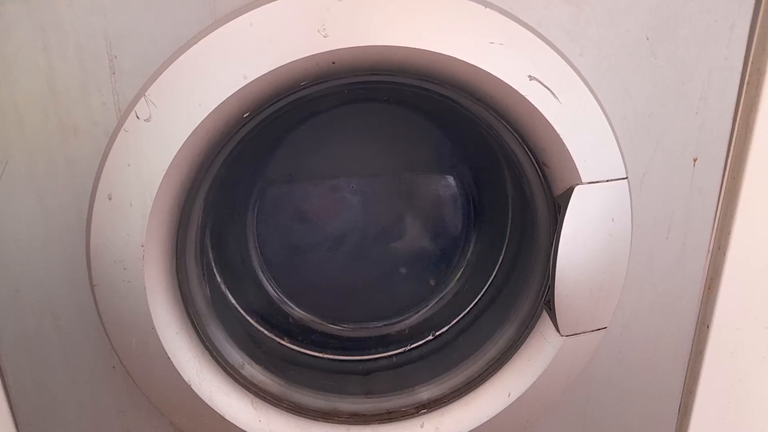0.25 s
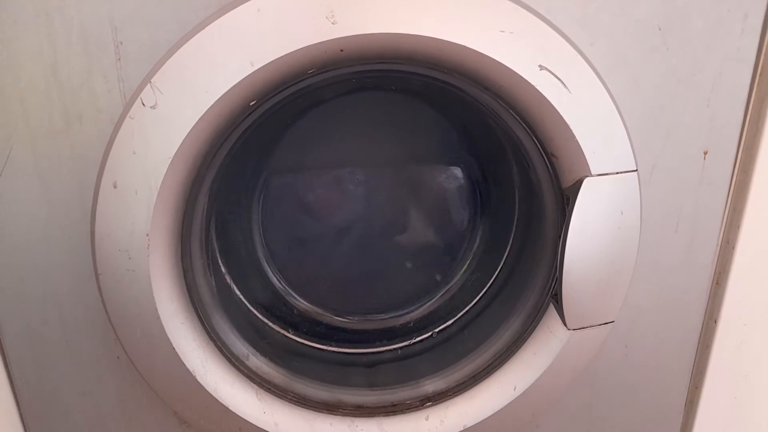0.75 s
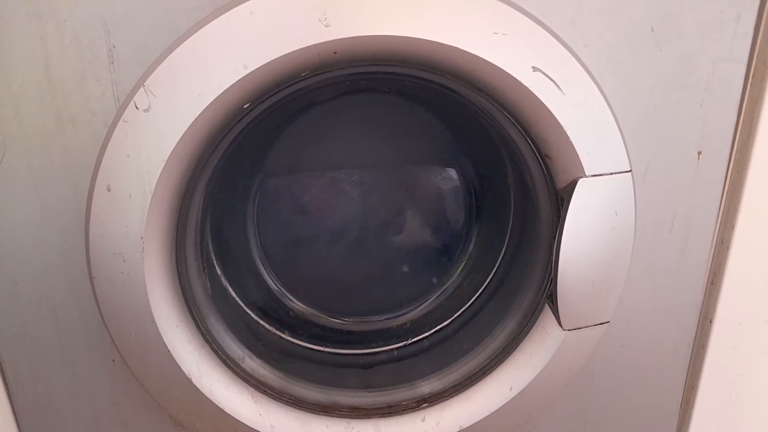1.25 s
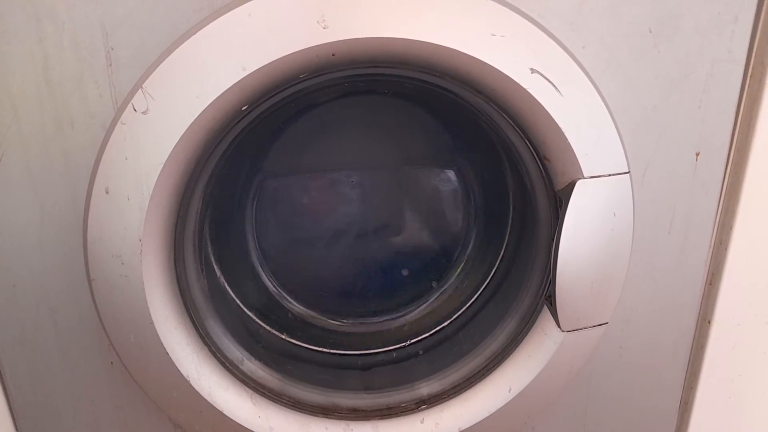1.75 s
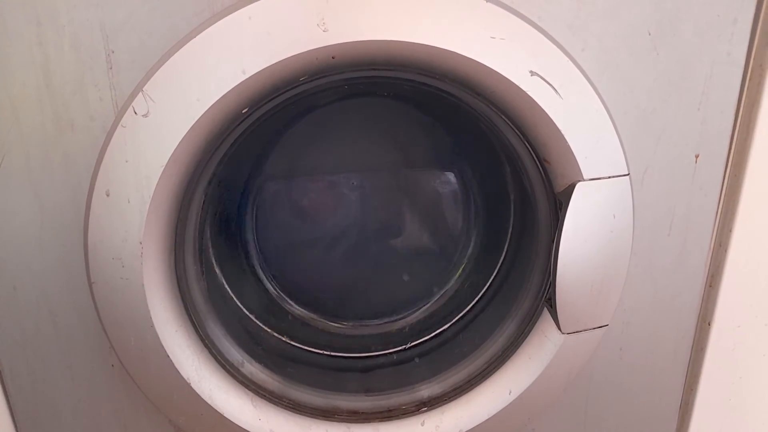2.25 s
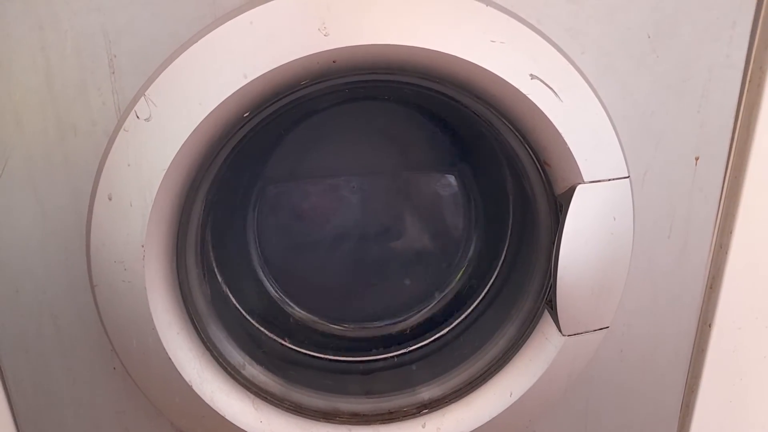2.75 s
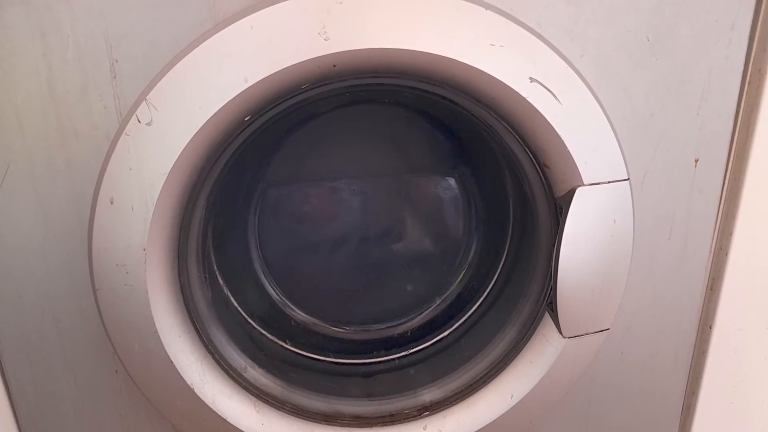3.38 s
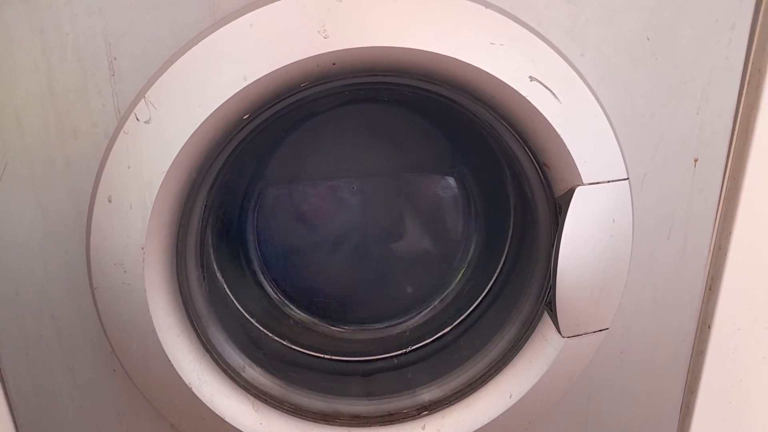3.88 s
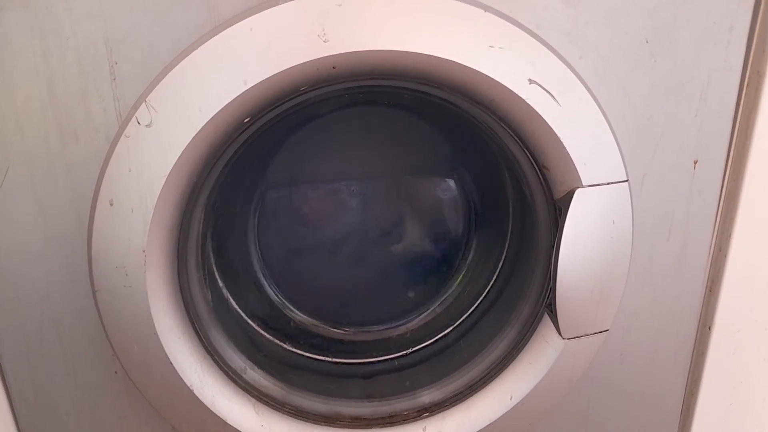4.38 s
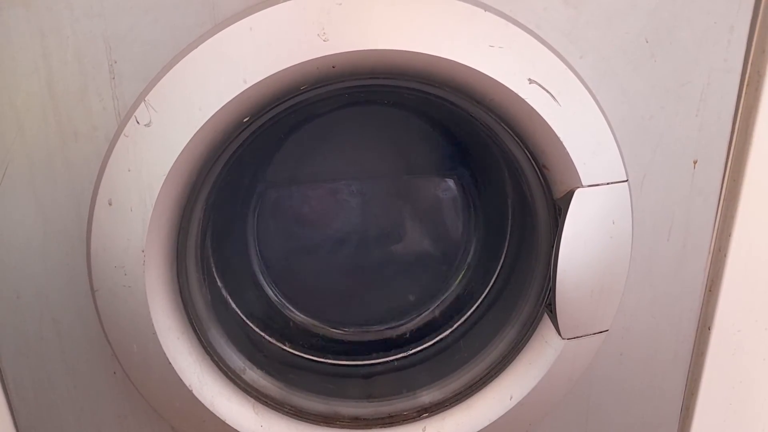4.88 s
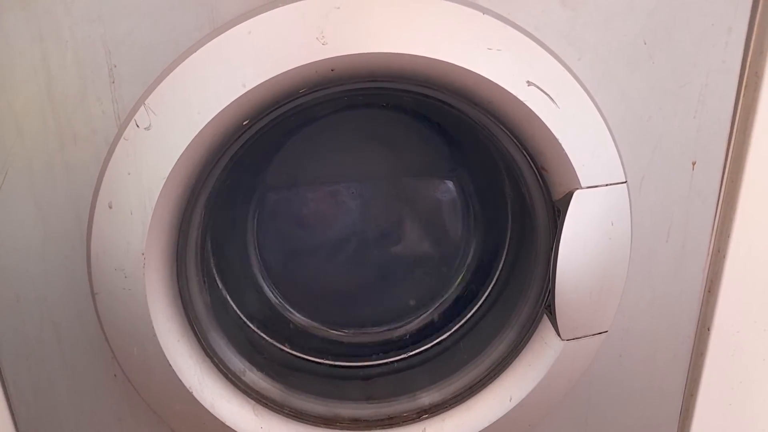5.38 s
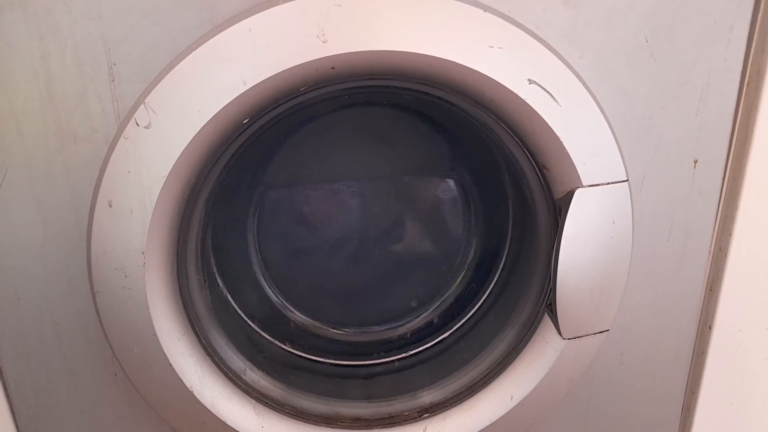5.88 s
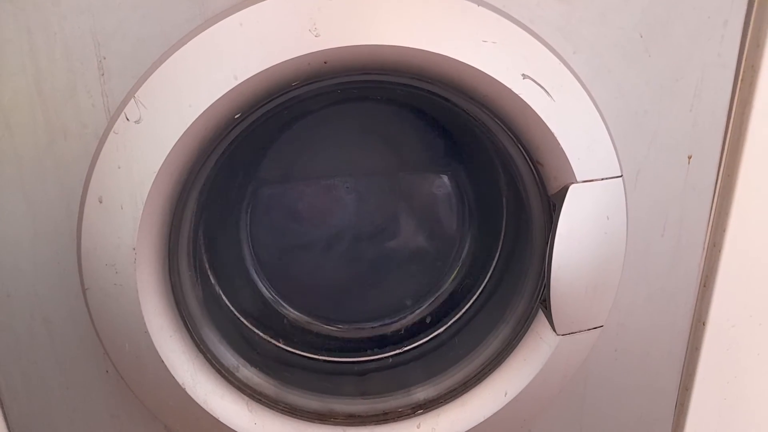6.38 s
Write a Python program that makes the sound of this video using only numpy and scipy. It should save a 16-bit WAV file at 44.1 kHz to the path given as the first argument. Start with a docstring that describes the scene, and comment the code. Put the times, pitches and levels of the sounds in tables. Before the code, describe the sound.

From 0 s a front-loading washing machine is already running fast in a small reverberant room, heard close in stereo. A low cabinet hum near 140 Hz and rapid drum throbs, about twelve turns a second, sit under a piercing, reedy motor whine with strong overtones around 2.6 and 5 kHz. The whine falls smoothly throughout, losing about a fifth of its pitch by 6.6 s, its overtones surging and fluttering as they cross resonances. The low hum weakens over the first seconds and the throbbing slows, swelling unevenly. Airy rush fades while hollow bearing roar grows and churns in short lumps, becoming duller. Dull tub knocks come around 0.9, 1.3, 1.7, 2.5-2.9, 3.3 and 3.7 s, then softer ones from 5.4 s. Fine brush buzz and hiss persist; two faint, high scraping hisses swell between 5.6 and 6.4 s. It ends still spinning.

```python
"""A cabinet already humming and thumping, under a whine that sinks: a front-loading washing machine
coasts down from its final spin in a small tiled room. The belt-driven drum strikes the cabinet twice
a turn, sweeping its overtones through the panel resonances, while the motor whines at its slot rate.
Filtered noise makes the bearings' churning roar, the rush of air and dull knocks; the brushes buzz
and hiss, drum and belt add faint tones, and two scraping hisses come near the end."""
import sys
import numpy as np
from scipy import signal
from scipy.fft import rfft, irfft
from scipy.io import wavfile
from scipy.ndimage import uniform_filter1d

SR = 44100
rng = np.random.default_rng(int(sys.argv[2]) if len(sys.argv) > 2 else 0)


def dump_mix(stems):
    """Bounce the given channels to the path in sys.argv[1] as a 16-bit WAV at rate SR."""
    frames = np.atleast_2d(stems).T  # one column per channel
    limited = np.clip(frames, -1, 1)  # hard clip at full scale
    pcm = np.round(limited * 32767).astype(np.int16)
    wavfile.write(sys.argv[1], SR, pcm)


N = 292824
TIME = np.arange(N) / SR
BELT_RATIO, SLOTS = 11.595, 18  # shaft turns per drum turn; slots on the rotor


def amp(db):
    """Logarithmic level: decibels to amplitude gain."""
    return 10 ** (np.asarray(db) / 20)


def unit(x):
    """Normalisation: scales to rms 1."""
    return x / np.sqrt(np.mean(x ** 2) + 1e-20)


def over_time(points):
    """Linear interpolation of a (time, value) table at every sample."""
    t, value = np.transpose(points)
    return np.interp(TIME, t, value)


def on_log_axis(points, x):
    """Interpolation along a logarithmic axis of frequency or order."""
    place, value = np.transpose(points)
    return np.interp(np.log(x + 1e-3), np.log(place), value)


def lift_db(peaks, hz):
    """Superposed resonance curves: bell-shaped lifts, or dips where negative, added in dB."""
    return sum(db / (1 + (2 * (hz - f) / width) ** 2) for f, width, db in peaks)


def drift(rate_hz, size=N, count=2 ** 13):
    """Low-passed random fluctuation of rms 1, drawn on a coarse grid of count points."""
    hz = np.fft.rfftfreq(count, size / count / SR)
    lowpass = 1 / (1 + (hz / rate_hz) ** 2) ** 2
    coarse = unit(irfft(rfft(rng.standard_normal(count)) * lowpass))
    return np.interp(np.arange(size), np.linspace(0, size, count), coarse)


def resonate(x, hz, width_hz):
    """Resonance: a second-order peak filter of gain 1 at its centre."""
    return signal.lfilter(*signal.iirpeak(hz, hz / width_hz, fs=SR), x)


def split(x, hz):
    """Complementary band division: the parts below and above a frequency."""
    low = signal.sosfiltfilt(signal.butter(2, hz, fs=SR, output="sos"), x)
    return low, x - low


def room(x, wet_db, t60=0.5, size=SR // 3, count=SR // 12):
    """Reverberation: direct sound plus a decaying tail, so a gliding tone flutters about a mean level of 1."""
    t = np.arange(size) / SR
    tail = rng.standard_normal((2, size)) * 1000 ** (-t / t60) * (t > .003)
    tail /= np.linalg.norm(tail, axis=1, keepdims=True)
    heard = x + amp(wet_db) * signal.oaconvolve(x, tail, axes=1)[:, :N]
    mean_power = uniform_filter1d((heard ** 2).mean(0), count)
    return heard / np.sqrt(mean_power + 1e-12)


# tub resonances that ring in the noise: f/Hz, width/Hz, lift/dB
TUB_MODES = [(300, 62, 7), (360, 56, 4), (417.8, 28, 11), (550, 21, 7), (686, 70, 1), (725, 22, 4.5),
             (818, 31.6, 9), (902, 23, 5.5), (975.5, 18, 8.5), (1167, 7.9, 7.5), (1377, 24, 7),
             (1485, 41, 7.5), (1752, 44, 9), (1860, 94, 8)]
# correlation of the two microphones' noise: f/Hz, likeness (1 = same)
MIC_LIKENESS = [(30, 0.3), (160, 0.76), (300, 0.95), (600, 0.73), (1200, 0.34), (2500, 0.47),
                (15000, -0.12)]
# left over right in that noise: f/Hz, level/dB
MIC_BALANCE = [(160, -1), (740, -0.5), (1220, -2.5), (2010, -9.5), (3330, 1), (9080, -1), (15000, 1)]


def tub_noise(colour):
    """Filtered noise: random excitation shaped by tub modes, partly coherent between two microphones."""
    hz = np.fft.rfftfreq(N, 1 / SR)
    a, b = rfft(rng.standard_normal((2, N)))
    same = np.clip(on_log_axis(MIC_LIKENESS, hz), -1, 1)
    pair = np.array([a, same * a + np.sqrt(1 - same ** 2) * b])
    sides = amp(np.outer([.5, -.5], on_log_axis(MIC_BALANCE, hz)))
    spectrum = amp(on_log_axis(colour, hz) + lift_db(TUB_MODES, hz))
    return unit(irfft(pair * sides * spectrum, N))


# the drum's blows in each turn: place/turn, signed force
DRUM_BLOWS = [(.75, 0.61), (0.2585, -0.3)]
# how hard the load pushes the cabinet, beyond what its speed alone gives: t/s, level/dB
LOAD_SWAY = [(0, -1.5), (.8, 0.5), (1.5, 0.5), (2.202, -1), (2.7, 1), (3.3, 0.5), (3.9, -0.5), (4.4, -1),
             (5.6, 0), (6.64, -3)]
# cabinet panel modes: f/Hz, width/Hz, level/dB
PANEL_MODES = [(33, 1.8, -41), (62.7, 3.3, -63), (74.7, 6.7, -56.5), (88.6, 3.3, -49), (111.8, 2.7, -45),
               (116.5, 2.8, -38.5), (130.4, 12, -53.5), (141.2, 3.3, -47.5), (141.4, 3.6, -40),
               (142.7, 4.9, -37.5), (147.8, 5.5, -41.5), (160, 1.2, -49), (178.2, 0.76, -39.5)]


def drum(turns, speed_power=1.65, unevenness=0.089, low_hz=52, top_hz=220, count=22):
    """Forced vibration: an unbalanced load knocks the tub, harder at speed, and the panel modes ring."""
    blows = np.zeros(len(turns))
    for place, force in DRUM_BLOWS:
        for k in range(3, count):  # harmonics of the drum's turning rate
            blows += force * np.cos(2 * np.pi * k * (turns - place))
    strength = unit(np.gradient(turns)) ** speed_power
    strength = strength * (1 + unevenness * drift(0.92, size=len(turns)))
    t = np.arange(N - len(turns), N) / SR
    strength = strength * amp(np.interp(t, *np.transpose(LOAD_SWAY)))
    # soft dampers, and little deep bass from a small box
    band = signal.butter(2, [low_hz, top_hz], "bandpass", fs=SR, output="sos")
    blows = signal.sosfiltfilt(band, np.sqrt(2) * blows * strength)
    return sum(amp(db) * resonate(blows, hz, width) for hz, width, db in PANEL_MODES)


def motor_hum(turns, mount_hz=141, width_hz=8, hum_db=-32):
    """Resonance of a mass on its mounting: rotor imbalance hums until the speed drops below it."""
    shake = np.sqrt(2) * np.sin(2 * np.pi * turns)
    return amp(hum_db) * resonate(resonate(shake, mount_hz, width_hz), mount_hz, width_hz)


# overtones of the whine, at 1 to 7 times the slot rate: level at t = 0/dB, change/(dB/s),
# share of the shell's lift that it follows, left over right/dB, sideband strength/dB, room/dB,
# lower over upper sidebands/dB
WHINE_OVERTONES = [(-48.5, -0.86, 0.87, -10, -3, -8, -4.5), (-41.5, 0.26, 0.16, -2, -4, -1, 0),
                   (-45, -0.66, 0.94, -2, -6, -1.5, 1), (-47, 0.93, 0.77, -2, 1, -1.5, 1.5),
                   (-49.5, -0.5, 0.37, 1, 7, 3, 2), (-48, 0.68, .5, 2, -1, -5, 2),
                   (-67, 1.8, .5, 3, 1, 8, 2)]
# sidebands that unequal slots put around each overtone: distance/shaft orders,
# level/dB (before each overtone's own sideband strength)
SLOT_SIDEBANDS = [(1, -3.5), (2, -10.5), (3, -22), (4, -15), (5, -35), (9, -52)]
# resonances of the motor's shell that shape overtones and sidebands: f/Hz, width/Hz, lift/dB
SHELL_MODES = [(2210, 14, 0.5), (2367, 152, 11), (2467, 23, 1.5), (2520, 62, -4), (2556, 24, 6),
               (3300, 260, 10), (3850, 2300, -5), (4480, 260, 3), (4650, 47, 10), (4550, 120, -1.5),
               (5770, 260, -16), (7080, 25, 5), (7245, 45, 3.5), (7380, 66, 6.5), (8320, 93, 3),
               (8600, 140, 4.5), (9260, 28, -1), (10250, 60, 1.5), (9920, 93, 4), (10150, 260, 9)]
# surges and dips of the second overtone: t/s, level/dB
SECOND_SURGES = [(0.0, -2.0), (0.13, 3.0), (0.27, 1.5), (0.42, -3.0), (0.57, 0.5), (0.74, -3.0),
                 (0.86, 3.0), (1.01, -2.5), (1.1, -0.5), (1.33, -4.5), (1.39, 0.5), (1.52, -2.0),
                 (1.66, 3.5), (1.79, -2.5), (1.98, -1.5), (2.17, 2.5), (2.23, -0.5), (2.34, 2.5),
                 (2.5, -0.5), (2.76, -0.5), (2.82, 3.5), (3.1, 0.0), (3.14, 3.0), (3.28, -0.5), (3.31, 3.5),
                 (3.37, -3.0), (3.45, 4.0), (3.6, 0.5), (3.94, 3.0), (4.02, -0.5), (4.1, 4.5), (4.17, 0.0),
                 (4.3, 3.0), (4.48, 0.0), (4.84, -1.5), (4.88, 1.5), (5.07, -4.5), (5.12, -0.5),
                 (5.35, -4.0), (5.54, -2.0), (5.7, -5.0), (5.9, 1.0), (6.02, -3.0), (6.23, -3.5),
                 (6.48, -1.0), (6.64, -3.0)]


def whine(turns, flutter_turns=0.0017, flutter_hz=20, swell_db=0.52, wander_db=0.7, wander_hz=2,
          skirt_db=-17, skirt_hz=350):
    """Modulation at the slot-passing rate: slots differ once a turn, and shell resonances weight the orders."""
    slot_hz = SLOTS * SR * np.gradient(turns)
    hz = np.fft.rfftfreq(N, 1 / SR)
    shell_db = lift_db(SHELL_MODES, hz)
    turns = turns + flutter_turns * drift(flutter_hz)
    angle = np.linspace(0, 1, 4097)  # one shaft turn
    offsets = np.arange(-SLOTS // 2, SLOTS // 2)  # sideband distances in shaft orders
    out = np.zeros((2, N))
    for k, overtone in enumerate(WHINE_OVERTONES):
        first_db, change_db_per_s, follow, pan_db, side_db, wet_db, lower_db = overtone
        sideband_db = on_log_axis(SLOT_SIDEBANDS, abs(offsets)) + side_db + lower_db * (offsets < 0)
        size = np.where(offsets == 0, 1, amp(sideband_db))
        phases = np.outer(angle, offsets) + rng.random(len(offsets))
        ripple = np.exp(2j * np.pi * phases) @ size  # over one turn
        carrier = np.exp(2j * np.pi * (k + 1) * SLOTS * turns)
        # a faint rasp around each overtone
        skirt = amp(skirt_db) * (drift(skirt_hz) + 1j * drift(skirt_hz))
        wave = carrier * (np.interp(turns % 1, angle, ripple) + skirt)
        # short waves meet the microphones out of step
        pair = np.array([wave.real, wave.imag])
        tone = irfft(rfft(pair) * amp(shell_db), N)
        level_db = first_db + change_db_per_s * TIME
        level_db = level_db + follow * np.interp(slot_hz * (k + 1), hz, shell_db)
        level_db = level_db + swell_db * np.sqrt(k + 1) * drift(28)  # higher overtones waver more
        if k == 1:
            level_db = level_db + over_time(SECOND_SURGES)
        else:
            level_db = level_db + wander_db * drift(wander_hz)
        out += room(tone, wet_db) * amp(level_db + pan_db * np.array([[.5], [-.5]]))
    return out


# slow level of the bearing roar, before its overall trim: t/s, level/dB
ROAR_LEVEL = [(0.0, -38), (.15, -34.5), (1.3, -33.5), (2.35, -33), (3.1, -31.5), (4.1, -31), (4.7, -30.5),
              (5.5, -30.5), (6.1, -30.5), (6.64, -30)]
# relative spectrum of the roar, also of the knocks: f/Hz, level per hertz/dB
ROAR_SPECTRUM = [(250, -39), (480, -19), (590, -13.5), (660, 2), (740, -2.5), (850, -6.5), (1000, -9.5),
                 (1190, -8.5), (1320, -25), (1700, -26), (2600, -42.5)]
# clumps in the roar, before scaling and smoothing: start t/s, length/s, lift/dB
ROAR_CHURNS = [(0.148, 0.17, 1), (0.35, 0.074, 2.5), (0.494, 0.035, 2.1), (0.564, 0.041, 3.5),
               (0.66, 0.039, 3.5), (0.73, 0.1, 1), (0.918, 0.19, 2), (1.177, 0.067, 2.5),
               (1.293, 0.041, 5.5), (1.335, 0.145, 2), (1.58, 0.12, 3), (1.922, 0.045, 4),
               (2.072, 0.05, 3.5), (2.503, 0.06, 3.5), (2.65, 0.15, 2), (2.797, 0.14, 3.5),
               (2.998, 0.035, 2.7), (3.167, 0.071, 4), (3.286, 0.16, 2), (3.507, 0.063, 3),
               (3.739, 0.095, 4.5), (3.877, 0.059, 4.0), (4.045, 0.035, 0.5), (4.076, 0.053, 3),
               (4.183, 0.04, 2.5), (4.3, 0.058, 2.5), (4.475, 0.067, 4), (4.64, 0.029, 2.7),
               (4.7, 0.042, 1.5), (4.77, 0.14, 2.6), (4.949, 0.089, 3), (5.078, 0.087, 2),
               (5.237, 0.054, 5), (5.32, 0.03, 3.5), (5.446, 0.031, 4.5), (5.542, 0.062, 5),
               (5.69, 0.145, 3), (5.864, 0.09, 4), (5.996, 0.14, 5), (6.16, 0.099, 4), (6.312, 0.088, 5.5),
               (6.503, 0.07, 3.5)]


def bearings(pace, roar_db=-0.5, churning=0.93, edge_hz=45, grain_db=0.88, grain_hz=45,
             split_hz=950, brightening=9.1):
    """Rolling noise: random contact, clumped as the tub rocks, loses treble as the drum slows."""
    clump_db = sum(db * ((TIME > start) & (TIME < start + length))
                   for start, length, db in ROAR_CHURNS)
    smooth = signal.butter(1, edge_hz, fs=SR, output="sos")
    clump_db = signal.sosfiltfilt(smooth, clump_db)
    level_db = over_time(ROAR_LEVEL) + roar_db + churning * clump_db + grain_db * drift(grain_hz)
    low, high = split(tub_noise(ROAR_SPECTRUM), split_hz)
    return (low + high * pace ** brightening) * amp(level_db)


# relative spectrum of the rush of air and brushes: f/Hz, level per hertz/dB
RUSH_SPECTRUM = [(25, -15), (70, -9.5), (125, -9), (180, 1.5), (245, -7.5), (420, -4.5), (1000, -5.5),
                 (1900, -12.5), (2500, -11), (3200, -17.5), (4600, -12.5), (5700, -25.5), (7200, -16.5),
                 (15000, -27)]


def rush(pace, rush_db=-37, speed_power=1.57, split_hz=2800, flicker_db=1.5):
    """Flow noise: the air dies away as a power of speed; the brushes' hiss above it stays."""
    noise = tub_noise(RUSH_SPECTRUM) * amp(rush_db + flicker_db * drift(49))
    air, hiss = split(noise, split_hz)
    return air * pace ** speed_power + hiss


# relative spectrum of the brush buzz: f/Hz, level per hertz/dB
BUZZ_SPECTRUM = [(1800, -7), (2500, 1), (3200, -10), (4600, -7), (5700, -11), (7000, 4), (9000, -8.5),
                 (11000, 5), (15000, -5)]


def buzz(turns, buzz_db=-50, growth_db_per_s=0.38, flutter_turns=0.0023, flutter_hz=20, wet_db=-2,
         count=140):
    """Periodic friction: brushes rub the same rough track each turn, a harmonic series on shaft speed."""
    angle = np.linspace(0, 1, 4097)  # one shaft turn
    phases = np.outer(angle, np.arange(1, count)) + rng.random(count - 1)
    track = np.exp(2j * np.pi * phases).sum(1)
    wave = np.interp((turns + flutter_turns * drift(flutter_hz)) % 1, angle, track)
    colour = amp(on_log_axis(BUZZ_SPECTRUM, np.fft.rfftfreq(N, 1 / SR)))
    tone = irfft(rfft(np.array([wave.real, wave.imag])) * colour, N)
    return room(tone, wet_db) * amp(buzz_db + growth_db_per_s * TIME)


# faint tones of drum, belt and bearings: rate/(cycles per drum turn), level/dB
RUNNING_TONES = [(12.61, -63), (13.61, -59.5), (14.7, -59), (15.53, -53.5), (16.27, -57.5), (17.73, -60.5),
                 (19.2, -64), (20.01, -58), (23.2, -61), (24, -64), (25, -64.5), (27, -60.5),
                 (35.71, -55.5)]


def running(drum_turns, waver_db=4.0, waver_hz=4):
    """Order tones: frequencies locked to the drum sink with it, each level wavering on its own."""
    out = np.zeros(N)
    for rate, db in RUNNING_TONES:
        tone = np.sqrt(2) * np.sin(2 * np.pi * (rate * drum_turns + rng.random()))
        out += amp(db + waver_db * drift(waver_hz)) * tone
    return out


# dull knocks of the swaying tub: t/s, level/dB (rms over the decay time)
TUB_KNOCKS = [(0.184, -31), (0.925, -24), (1.344, -26), (1.693, -28.5), (2.473, -27.5), (2.752, -26),
              (2.873, -26), (3.279, -30), (3.727, -30), (5.45, -33), (5.577, -32), (5.686, -32.5),
              (6.003, -31), (6.196, -34), (6.395, -29)]


def knocks(attack_s=0.0018, decay_s=0.012, ring_s=.1):
    """Damped response to impact: each knock is a short, exponentially decaying shudder of the tub modes."""
    ring, out = tub_noise(ROAR_SPECTRUM), np.zeros((2, N))
    for start, db in TUB_KNOCKS:
        span = slice(int(start * SR), int((start + ring_s) * SR))
        t = TIME[span] - TIME[span][0]
        burst = ring[:, span] * (1 - np.exp(-t / attack_s)) * np.exp(-t / decay_s)
        out[:, span] += amp(db) * unit(burst) * np.sqrt(decay_s / ring_s)
    return out


# scraping hisses near the end: start t/s, length/s, f/Hz, width/Hz, level at the crest/dB
BRUSH_SCRAPES = [(5.62, 0.39, 6270, 300, -50), (5.65, .7, 10500, 350, -55)]


def scrapes():
    """Narrow-band friction noise: hiss that swells and fades, as of a brush rubbing harder."""
    out = np.zeros((2, N))
    for start, length, hz, width_hz, db in BRUSH_SCRAPES:
        noise = rng.standard_normal((2, N))
        hiss = resonate(resonate(noise, hz, width_hz), hz, width_hz)
        swell = np.sin(np.pi * np.clip((TIME - start) / length, 0, 1))
        out += amp(db) * unit(hiss) * swell
    return out


# shaft speed at t = 0, its braking by friction, and how that braking eases
START_HZ, BRAKE_HZ_PER_S, EASING_HZ_PER_S2 = 143.236, 4.8128, .026314


def scene(count=4):
    """Common drive: one slowing shaft sets the phase or pace of the machine's running sounds."""
    t = np.arange(-SR // 2, N) / SR  # the cabinet is already ringing at time zero
    shaft = START_HZ * t - BRAKE_HZ_PER_S * t ** 2 / 2 + EASING_HZ_PER_S2 * t ** 3 / 3  # turns
    cabinet = (drum(shaft / BELT_RATIO) + motor_hum(shaft))[-N:]
    turns = shaft[-N:]
    pace = unit(np.gradient(turns))  # speed relative to its rms average
    rumble = cabinet + bearings(pace) + rush(pace) + running(turns / BELT_RATIO) + knocks()
    left, right = rumble
    right = np.pad(right, (count, 0))[:N]  # it reaches the right microphone a few samples late
    return np.array([left, right]) + whine(turns) + buzz(turns) + scrapes()


def record(dry, edge_hz=15850):
    """Band limitation: a steep linear-phase low-pass leaves nothing above about 16 kHz."""
    lowpass = signal.firwin(511, edge_hz, window=("kaiser", 9), fs=SR)
    return signal.oaconvolve(dry, lowpass[None], "same")


dry = scene()
out = record(dry)
dump_mix(out)
```